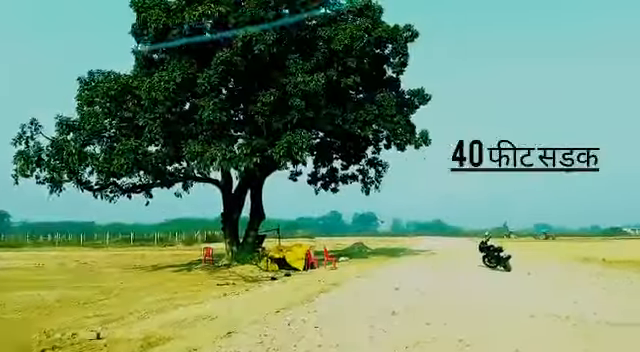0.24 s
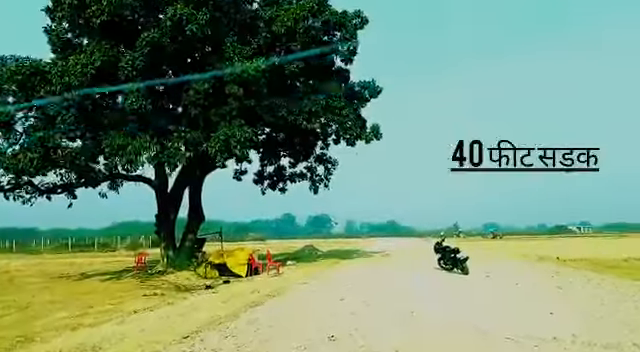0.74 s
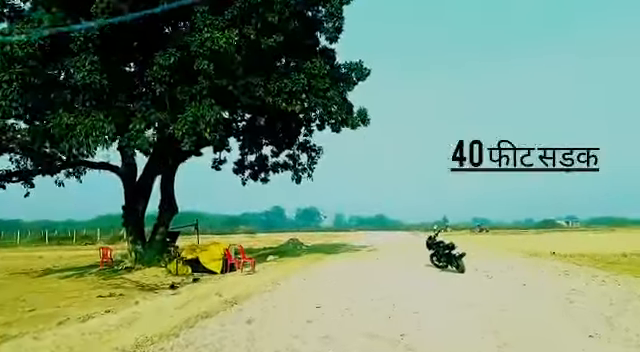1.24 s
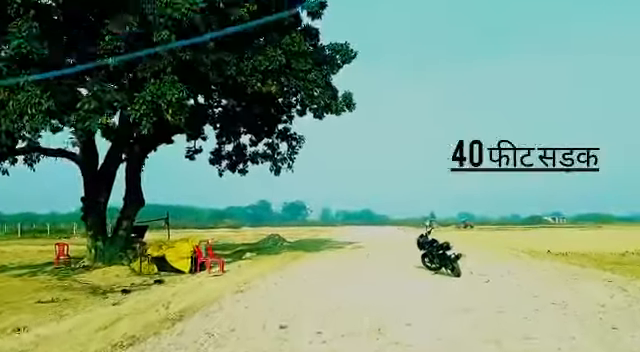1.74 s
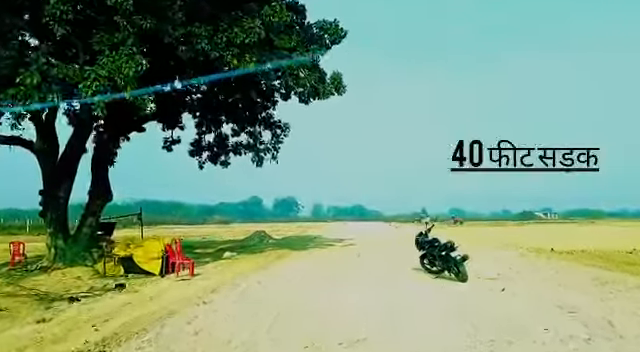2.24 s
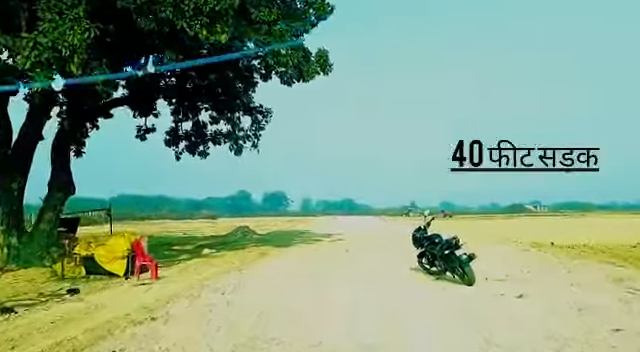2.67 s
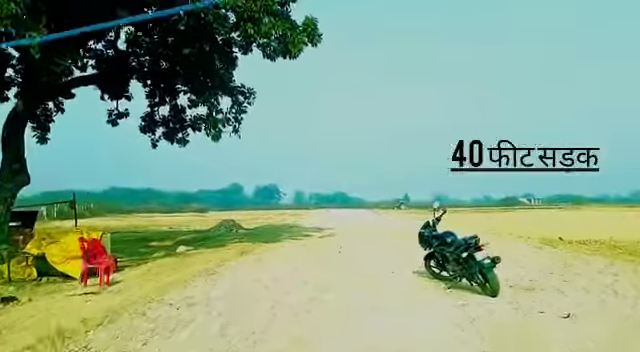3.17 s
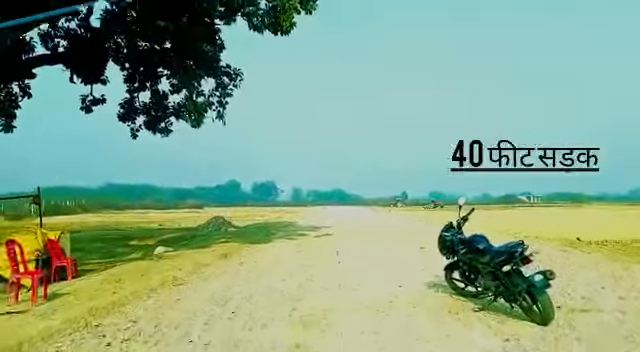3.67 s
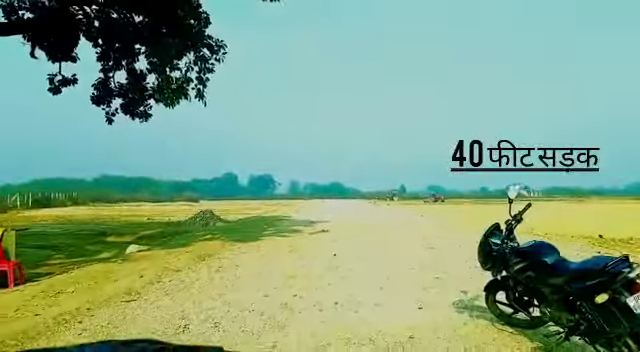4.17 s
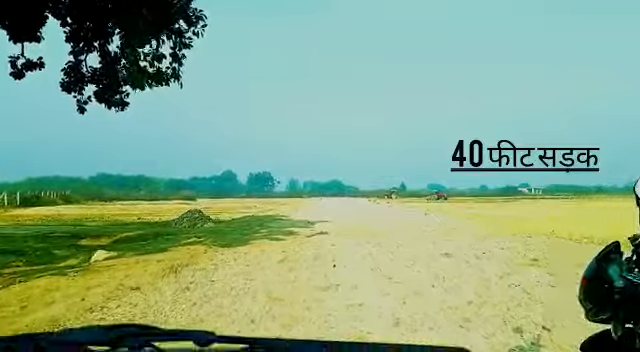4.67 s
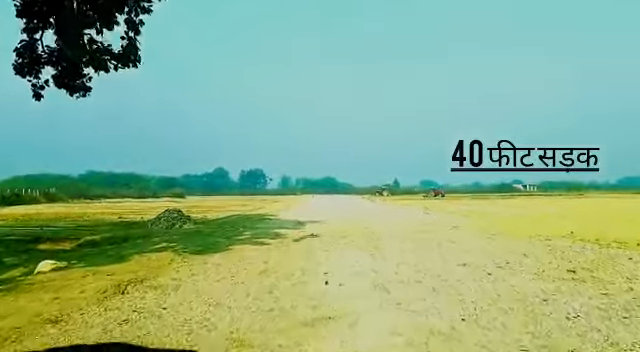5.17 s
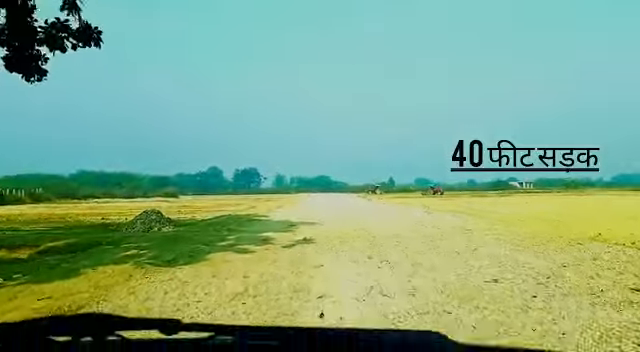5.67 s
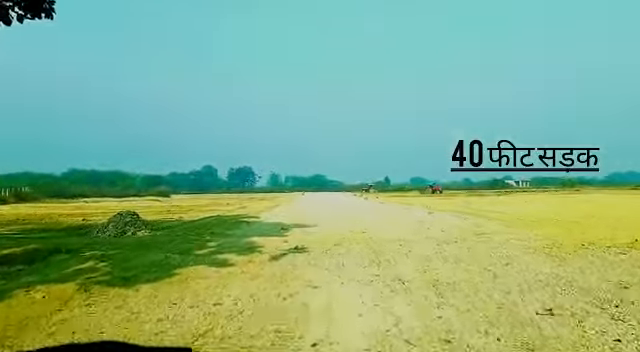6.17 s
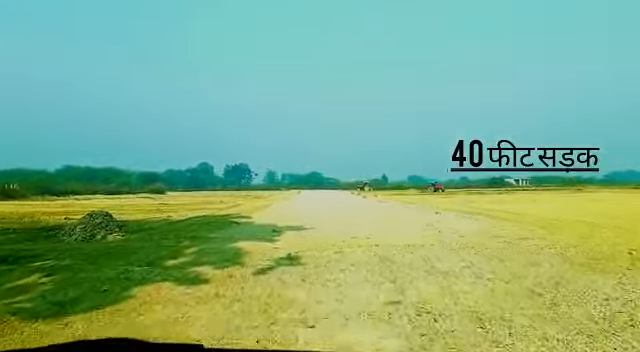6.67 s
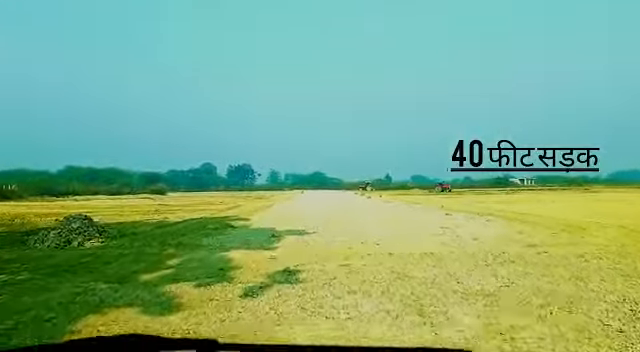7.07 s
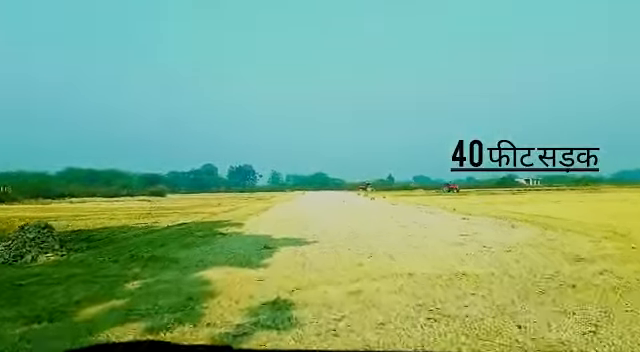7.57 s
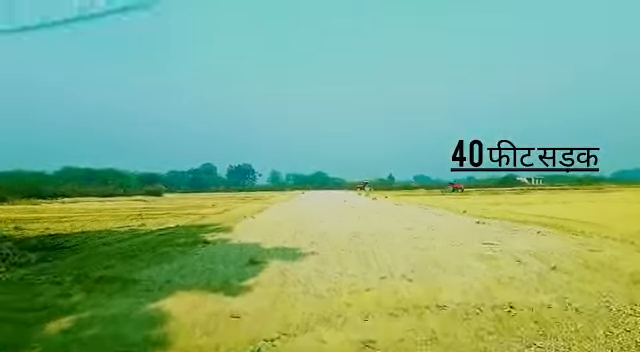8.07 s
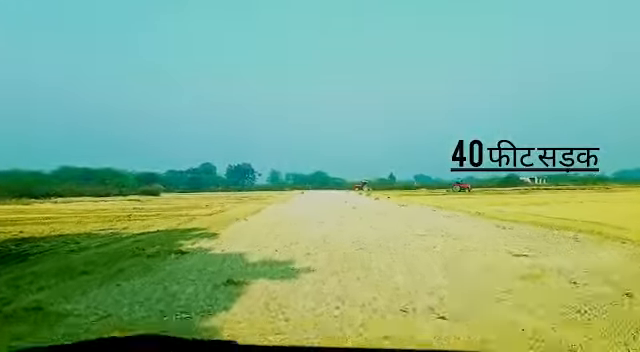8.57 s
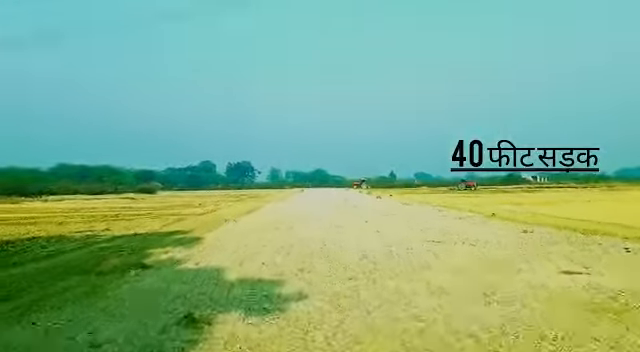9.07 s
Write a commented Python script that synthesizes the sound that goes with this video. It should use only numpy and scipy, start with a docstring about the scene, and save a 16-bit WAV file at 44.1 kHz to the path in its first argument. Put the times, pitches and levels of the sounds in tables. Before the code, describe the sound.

A car rolls slowly along a rough gravel road for about nine seconds, heard from inside its small, boxy cabin through a phone's close stereo microphones. From the start keys jingle almost without pause, bright, thin and uneven, with odd single keys ringing for an instant. Soft low bumps boom at the start and near 0.9 s. One hard crack comes at 1.9 s, then a dense run of deep thumps and body heaves fills 2.1 to 3.2 s, with another jolt and knock around 3.8 s. From 4 to 7 s it is calmer: keys dominate, with a strong bump at 5.7 s and light knocks after 6 s. Bumps return at 7.2 s, a sharp knock at 7.8 s, and from 8.4 s to the end the ride turns rough, thudding and rattling, with a hollow panel thunk at 9 s. Gravel crunches and hisses faintly underneath throughout.

```python
"""Inside a car rolling slowly over gravel, heard close by through a phone's two microphones.
Nearest the ear in level are bumps that boom the cabin's air (decaying-in-both-directions tone lumps over shaped noise),
then cracks of noise through the body and hollow thunks of trim panels (clusters of notes).
A bunch of keys clinks about a dozen times a second (struck modes and dense noise); single keys ring as sines.
Gravel crunches and hisses behind as grainy noise. The right port is nearer the keys but duller in the treble."""
import sys
import numpy as np
from scipy import signal
from scipy.fft import rfft, irfft, next_fast_len
from scipy.io import wavfile
from scipy.ndimage import uniform_filter1d, map_coordinates

SR = 44100
rng = np.random.default_rng(int(sys.argv[2]) if len(sys.argv) > 2 else 0)


def dump_mix(stems):
    """Bounce the given channels to the path in sys.argv[1] as a 16-bit WAV at rate SR."""
    frames = np.atleast_2d(stems).T  # one column per channel
    limited = np.clip(frames, -1, 1)  # hard clip at full scale
    pcm = np.round(limited * 32767).astype(np.int16)
    wavfile.write(sys.argv[1], SR, pcm)


N = 411453
T = np.arange(N) / SR

# Table levels are taken before the trims in the functions; spectra are relative level per Hz.
# roughness of the road: t/s, background boom level/dB, shake level/dB, panel drone level/dB
ROAD = [(0.0, -48.5, -38, -54.5), (0.39, -45.5, -44, -55.5), (1.06, -48, -46, -56.5),
        (1.27, -44, -49, -55.5), (1.56, -52.5, -57, -61), (1.87, -48, -39.5, -58), (2.26, -35.5, -47, -49),
        (3.56, -49.5, -44, -56.5), (3.87, -36.5, -41, -50), (4.16, -47.5, -50.5, -57),
        (4.62, -43.5, -45.5, -58), (5.14, -47, -53, -56.5), (5.56, -42.5, -50, -55.5),
        (5.84, -47, -48.5, -55.5), (7.04, -49.5, -35.5, -58), (7.25, -40.5, -47, -54.5),
        (8.34, -47.5, -49, -56), (8.55, -37.5, -39, -54), (8.83, -49, -43, -50.5),
        (9.33, -41.5, -47, -56.5)]
# bumps that set the cabin's air booming: t/s, peak level/dB, f/Hz, width/ms about 5 dB down (at least 15)
BUMPS = [(0.009, -21, 146.4, 18), (0.297, -31, 128, 24), (0.385, -32.5, 127, 64), (0.573, -23, 129.4, 31),
         (0.716, -28.5, 131, 10), (0.851, -19.5, 125, 30.5), (1.34, -26.5, 129, 37), (1.379, -23.5, 97, 9),
         (2.025, -26, 116.5, 30), (2.108, -16.5, 132.5, 33), (2.152, -27.5, 139, 11),
         (2.266, -18, 114.5, 48), (2.398, -32, 127, 13), (2.467, -16, 122, 17.5), (2.571, -19.5, 130, 18),
         (2.644, -15.5, 129.6, 15), (2.787, -29, 130, 20), (2.882, -30.5, 117, 12), (2.997, -34.5, 127, 32),
         (3.059, -24.5, 122, 13), (3.11, -25, 110, 10), (3.183, -20.5, 139, 34), (3.731, -19.5, 114, 60),
         (3.788, -18.5, 131.3, 58), (3.958, -32, 107, 16), (4.826, -24.5, 144, 33), (4.875, -24, 125, 24),
         (5.252, -25.5, 121, 48), (5.416, -22, 128, 35), (5.482, -27, 119, 12), (5.676, -14.5, 131, 40.5),
         (6.509, -28.5, 124.2, 85), (6.633, -27, 125, 26), (7.201, -16.5, 130, 34),
         (7.407, -21, 128.6, 114), (7.687, -28.5, 119, 13), (7.861, -29, 124, 26), (8.086, -22, 125.3, 45),
         (8.369, -21.5, 150.5, 32), (8.417, -30, 150, 38), (8.496, -26.5, 139, 38), (8.587, -17.5, 146, 18),
         (8.653, -14.5, 120.5, 43), (8.727, -22, 139.5, 34), (8.885, -26.5, 131, 44),
         (9.057, -16.5, 127, 27), (9.168, -28, 145, 49), (9.289, -24, 108, 13.5)]
# ruts that heave the whole body: start t/s, length/s, level/dB
HEAVES = [(0.828, 0.023, -37), (1.338, 0.048, -36.5), (1.454, 0.13, -34), (2.092, 0.11, -28.5),
          (2.219, 0.047, -34), (2.307, 0.049, -30), (2.385, 0.039, -29.5), (2.468, 0.14, -33.5),
          (2.662, 0.17, -30.5), (3.09, 0.11, -34), (3.68, 0.084, -28), (4.805, 0.041, -33),
          (5.407, 0.087, -34), (5.66, 0.12, -28), (6.463, 0.12, -34), (7.07, 0.025, -29),
          (7.12, 0.069, -35.5), (7.483, 0.038, -31.5), (7.92, 0.11, -29.5), (8.464, 0.064, -33),
          (8.65, 0.073, -37), (9.259, 0.03, -31.5)]
# jolts that rattle the panels: start t/s, length/s, level/dB
JOLTS = [(2.142, 0.057, -37), (2.358, 0.051, -35.5), (2.416, 0.11, -31), (3.762, 0.099, -33.5),
         (5.422, 0.067, -38.5), (7.826, 0.11, -38.5), (7.999, 0.069, -39), (8.355, 0.1, -31.5),
         (8.486, 0.055, -37.5), (8.567, 0.077, -37), (8.826, 0.18, -44), (9.001, 0.15, -27)]
# spectrum of the cabin's boom: f/Hz, level/dB
BOOM_SPECTRUM = [(30, -68), (70, -40), (100, -3.5), (120, 3), (130, 3.5), (150, -6), (185, -5.5),
                 (230, -84), (500, -130)]
# spectrum of the body's shake: f/Hz, level/dB
SHAKE_SPECTRUM = [(12, -33), (25, 9), (35, -1.5), (50, 15), (65, 18.5), (90, 19), (115, -45), (300, -130)]
# spectrum of the panels' drone: f/Hz, level/dB
DRONE_SPECTRUM = [(60, -74), (140, -7), (190, 0), (240, -1.5), (330, -4), (400, -12.5), (470, -12),
                  (600, -81), (1500, -130)]
# knocks through the body: t/s, peak level/dB, treble against it level/dB, rise/ms, t60/s
KNOCKS = [(1.889, -14, -0.5, 0.42, 0.1), (2, -35.5, 1, 7.5, 0.098), (2.46, -32, -17, 10, 0.23),
          (3.035, -24.5, -1.5, 9.5, 0.086), (3.778, -32, 13, 1, 0.074), (3.807, -17.5, -2.5, 0.44, 0.087),
          (3.936, -20, -1, 12, 0.098), (6.12, -32, 0, 4.7, 0.13), (6.295, -29.5, 5, 8, 0.15),
          (6.878, -36, -6, 8.5, 0.11), (7.067, -40.5, -7, 4.8, 0.13), (7.431, -35.5, 25, 8.9, 0.21),
          (7.798, -29, 6, 4, 0.15), (7.823, -15, 11, 4, 0.07), (7.944, -19, -9, 0.66, 0.13),
          (8.385, -38, -20, 4.7, 0.57), (8.512, -25, -1, 3.3, 0.092), (8.66, -16, 4, 4.3, 0.072),
          (9.021, -26, -5, 3.6, 0.53), (9.082, -20, -2.5, 3.9, 0.12)]
# spectrum of a knock up to its treble: f/Hz, level/dB
KNOCK_SPECTRUM = [(300, -29), (650, 1), (1000, -7), (1800, -0.5), (2500, -9)]
# short hollow thunks of trim panels: t/s, peak level/dB, f/Hz
THUNKS = [(2.479, -34, 489), (3.033, -41, 554), (3.807, -38.5, 713), (4.068, -41.5, 504),
          (4.472, -42.5, 623), (4.675, -44, 619), (4.689, -40, 850), (6.418, -40, 630), (6.466, -45, 668),
          (6.979, -40.5, 518), (7.368, -41.5, 530), (7.823, -43.5, 720), (8.391, -38.5, 592),
          (8.49, -38, 337), (8.655, -41.5, 584), (8.986, -44, 710), (9.015, -22, 334), (9.09, -31, 311),
          (9.129, -50, 556)]
# key clinks: t/s, peak of the loudest key level/dB, lower keys against it level/dB,
# thin high keys against it level/dB, rise/ms, nominal t60/ms (at least 40)
CLINKS = [(0.0287, -34, -7.5, -6, 12.2, 69), (0.097, -37, -7, -8, 5.9, 120),
          (0.1647, -34.5, -10, -4.5, 13.5, 32), (0.2411, -46.5, -3, -15, 1.8, 47),
          (0.3883, -59, -1.5, -13, 1.8, 490), (0.484, -37, -10.5, -14, 3.8, 59),
          (0.671, -40, -8, -8, 4.8, 120), (0.7399, -34.5, -4.5, -3.5, 6.5, 175),
          (0.816, -40, -12, -13, 2, 45), (0.9255, -54, -5, -26, 7, 37), (0.981, -41, -9, -18, 3, 120),
          (1.0676, -38.5, -8, -7, 4.7, 160), (1.143, -47, -2.5, -6, 19, 104),
          (1.2341, -53, 7.5, 7.5, 4, 74), (1.3114, -40, 0.5, -3, 6.6, 91),
          (1.386, -42.5, 0.5, -3, 1.8, 123), (1.4544, -49.5, -7, -6, 7.9, 46),
          (1.5272, -31, -15.5, -9, 3, 360), (1.6193, -40.5, -2.5, -10, 4, 91),
          (1.6832, -41.5, -3, 3, 4.8, 56), (1.7776, -39.5, -8, -14, 7.3, 130), (1.932, -45, -3, -10, 1, 84),
          (2.159, -44, -10, -17, 8.2, 98), (2.1793, -40, -18, -19, 1.8, 41), (2.23, -48, -16, -24, 1, 37),
          (2.3889, -49, 7, 1, 3.3, 160), (2.48, -55.5, 2, -9, 11, 65), (2.611, -39, -11, -9, 8.5, 54),
          (2.6777, -30.5, -11, -8.5, 4, 250), (2.757, -44, -8, -11, 1.2, 310),
          (2.827, -35.5, -7.5, -2.5, 14, 82), (3.019, -50, 1.5, -16, 17, 100),
          (3.17, -42, -8.5, -7, 15, 550), (3.246, -35, -8, -6, 28.7, 80), (3.312, -42.5, -11, -4, 10, 60),
          (3.386, -41, -5, -1.5, 14, 71), (3.5898, -39.5, -13, -11, 12, 43),
          (3.6647, -41.5, -9, -11.5, 5.9, 340), (3.7433, -56, 3, -5, 24, 940), (3.8048, -39, 0, -8, 3, 140),
          (3.913, -35.5, -5.5, -1.5, 41, 70), (4.0108, -33.5, -12, -7.5, 4.3, 104),
          (4.0872, -33.5, -11.5, -12, 7.2, 100), (4.125, -51.5, -0.5, 3, 11, 120),
          (4.2353, -38.0, -21, -14.5, 4.9, 120), (4.296, -36, -12, -14, 11, 38),
          (4.4517, -36.5, -3.5, -4.5, 5.6, 200), (4.5272, -31, -6.5, -2, 2.7, 87),
          (4.595, -41.5, -7, -2, 7.3, 200), (4.6504, -42.5, -3, -4, 1, 220),
          (4.773, -55.5, 10.5, -3, 2.3, 41), (4.869, -63, -6, 11.5, 2.3, 80),
          (4.894, -38, -10.5, -8.5, 8.9, 134), (4.972, -31, -13, -13.0, 27.7, 110),
          (5.091, -54, 3, -5, 1.8, 150), (5.1311, -36.5, -15.5, -10, 4.6, 310),
          (5.1684, -39.5, -15, -28, 1, 100), (5.343, -48, -5, 0, 2.7, 330),
          (5.3905, -41.5, -7, -30, 5.6, 150), (5.4653, -49.5, -10, -17, 16, 150.0),
          (5.538, -37.5, -13.5, -8, 2.6, 370), (5.607, -45.5, -4, -0.5, 1, 91),
          (5.685, -35.5, -3.5, -6, 3.5, 135), (5.7501, -40.5, -10.5, -8, 8.4, 220),
          (5.846, -56, -10, 1, 2, 77), (5.9784, -41, -6.5, -7, 6, 220), (6.049, -36.5, -10.5, -7, 3.5, 240),
          (6.113, -33, -5.5, -5.5, 6.2, 140), (6.2054, -42, -9, -15.5, 3.3, 180),
          (6.2847, -32, -7.5, -9.5, 14, 213), (6.45, -39.5, -4.5, -3.5, 2.5, 160),
          (6.5327, -37, -14, -10.5, 7.1, 120), (6.676, -50, -9, -15, 2.3, 40),
          (6.704, -49, -13.5, -6, 8, 67), (6.754, -57.5, 5.5, -3.5, 2.3, 53),
          (7.162, -41.5, -6, -1.5, 9.2, 330), (7.2356, -37, -2, -15, 5, 99),
          (7.4198, -53, 0.5, -0.5, 6.6, 510), (7.498, -34.5, -6.5, -7, 6.1, 43),
          (7.571, -50, -2, -9, 4, 220), (7.6548, -43, -4.5, -10.5, 4.3, 150),
          (7.7427, -35.5, -7.5, -9, 3.9, 230), (7.7951, -28.5, -4.5, -7, 33, 85),
          (7.8782, -37.5, -1, -8, 13, 250), (7.9423, -56, 2, 4, 1.6, 570),
          (8.0317, -37.5, -13, -8.5, 7.1, 150), (8.328, -43.5, -1, 1, 2.2, 200),
          (8.395, -38, -4.5, -2.5, 2.3, 210), (8.515, -50, 4, -7, 1, 130.0),
          (8.65, -36, 0.5, -0.5, 1.9, 230), (8.7157, -39, -2.5, -2, 2.5, 140),
          (8.7918, -39.5, -4.5, -3, 1.9, 210), (8.9403, -42.5, -0.5, -1, 13, 350),
          (9.0038, -34, -6.5, -6.5, 8.2, 230), (9.076, -34, -13.5, -5.5, 9.3, 150),
          (9.1424, -38.5, -4.5, -6.5, 4.9, 1100), (9.188, -41, 1, -7.5, 5.6, 100)]
# centres of the lower, loudest and thin high keys: f/Hz
CLINK_HZ = [5200, 6500, 8000]
# clear modes of the keys: f/Hz, level/dB, t60/s
KEY_MODES = [(2952, -79, 0.62), (3447, -76, 0.17), (4632, -73.5, 0.3), (5040, -74, 0.16),
             (5770, -72.5, 0.063), (6497, -63.5, 0.13), (6528, -58.5, 0.12), (7460, -80, 0.059),
             (7650, -63.5, 0.015), (8784, -72, 0.34), (9500, -65.5, 0.039), (14976, -93.5, .08)]
# spectrum of the keys' dense small modes: f/Hz, level/dB
JANGLE_SPECTRUM = [(600, -17.5), (1100, -13), (1700, 2), (2300, -12), (3000, -7), (4000, -6.5),
                   (5300, -12.5), (6450, 7), (7300, -9), (8150, -35), (8700, -7), (10200, -7),
                   (11400, -17.5), (12300, -40), (14000, -39), (15000, -37), (16000, -51.5)]
# one key swings clear of the bunch and rings: start t/s, length/s, peak level/dB, f/Hz
CHIMES = [(0.034, 0.18, -50, 4640), (0.039, 0.098, -61, 5130), (0.487, 0.035, -53, 4610),
          (0.69, 0.05, -62, 5000), (0.747, 0.054, -48, 8767), (0.767, 0.045, -47, 5065),
          (1.074, 0.045, -50, 4570), (1.08, 0.05, -54, 5060), (1.147, 0.067, -56, 5100),
          (1.448, 0.036, -52, 4590), (1.526, 0.059, -44, 4620), (1.556, 0.11, -52, 5010),
          (1.594, 0.041, -57, 8700), (1.676, 0.021, -64, 3410), (1.842, 0.012, -39.5, 5060),
          (2.197, 0.04, -61, 4630), (2.26, 0.023, -57, 4690), (2.395, 0.038, -58, 4650),
          (2.621, 0.25, -55.5, 4660), (2.689, 0.052, -51, 8773), (2.786, 0.042, -50, 8759),
          (3.178, 0.073, -57, 4630), (3.197, 0.2, -47, 3430), (3.264, 0.051, -52, 5061),
          (3.794, 0.069, -50, 8763), (3.955, 0.25, -61, 3400), (4.012, 0.026, -44, 4630),
          (4.093, 0.041, -57, 5060), (4.446, 0.18, -56.5, 8760), (4.458, 0.1, -56, 5100),
          (4.592, 0.023, -48, 4640), (4.969, 0.056, -51, 4730), (4.996, 0.065, -55, 3430),
          (5.137, 0.043, -52, 4660), (5.153, 0.09, -59, 5030), (5.381, 0.084, -57, 5060),
          (5.65, 0.21, -58, 3465), (5.99, 0.27, -56.5, 4980), (6.093, 0.038, -39, 5650),
          (6.447, 0.037, -48, 4620), (6.542, 0.031, -46, 5040), (7.066, 0.04, -58.5, 2600),
          (7.16, 0.027, -46, 4650), (7.222, 0.061, -52, 4675), (7.66, 0.046, -53, 5080),
          (8.039, 0.091, -51.5, 4675), (8.328, 0.13, -51.5, 5050), (8.336, 0.1, -54, 3450),
          (8.402, 0.043, -50, 4670), (8.664, 0.1, -45, 3460), (8.812, 0.086, -55, 8761),
          (9.046, 0.034, -43, 8800), (9.195, 0.036, -57, 3410)]
# how the cabin's answer dies: f/Hz, t60/s
CABIN = [(500, 0.32), (4000, 0.15), (12000, 0.032)]
# gravel under the tyres: t/s, crunch level/dB, hiss level/dB
GRAVEL = [(0.0, -64, -59), (0.72, -64, -65), (1.48, -65, -56.5), (1.92, -67.5, -61.5), (2.39, -58.5, -57.5),
          (2.96, -63.5, -61), (3.66, -66, -62), (3.84, -61, -59.5), (5.38, -65.5, -64), (5.56, -63, -56.5),
          (5.92, -65.5, -66.5), (6.31, -60.5, -54.5), (6.62, -66.5, -63.5), (7.95, -64.5, -64.5),
          (8.26, -65, -59), (8.58, -60, -52.5), (8.78, -62, -55.5), (9.33, -57, -55.5)]
# spectrum of the crunch: f/Hz, level/dB
CRUNCH_SPECTRUM = [(150, -75), (350, -7), (500, 7), (650, 3), (850, 2), (1100, -6), (1500, -22.5),
                   (4000, -130)]
# spectrum of the hiss: f/Hz, level/dB
HISS_SPECTRUM = [(530, -29), (900, -30), (1120, -0.5), (1260, 0.5), (2600, -6), (3110, -9), (3890, -12.5),
                 (6000, -7), (6670, -8), (7740, -29.5), (8150, -28), (8700, -17.5), (11300, -32),
                 (14700, -63), (22000, -120)]
# likeness of left and right in the road and gravel noise: f/Hz, correlation
ALIKE = [(60, 0.98), (110, 0.99), (190, 0.97), (340, 0.54), (610, 0.48), (1080, -0.23), (1920, 0.28),
         (3430, -0.27), (6110, 0.057), (10900, 0.47)]
# microphone ports: f/Hz, left minus right level/dB
PORTS = [(130, -.5), (300, -2.5), (700, 1), (1800, 4), (3300, 3.5), (4700, -3), (5800, -7.5), (6500, -1),
         (7400, 14.5), (8000, 27), (8500, 18), (10000, 32), (11500, 31), (13000, 10), (15500, 6)]

CONTACTS, SPREAD_DB = 500, 6.5  # contacts a second in a clink, chance in each mode's level
HOLD_MS, STOP_DB_PER_MS = 63, 0.2  # the bunch falls quiet this long after the rise, nominal rate
GLINT_DB = 5.5  # small modes flare up and die inside a clink
BODY_HZ, BODY_RISE_S = 4350, 0.004  # the lower jangle joins late
RING_DB, ROUND = 77.5, 0.3  # gain of the clear modes, share of the rise that rounds the front
THIN_HZ, JOIN_S = 7800, 0.008  # lower edge of the thin keys, mean chance time in which keys join
CHIME_RISE_S, CHIME_FADE_DB, CHIME_STOP_S = 0.008, 9, 0.004  # onset, loss over the length, damping
GRAZES, FLICKER_DB, SLIP_RAD = 110, 4, 1.6  # grazes a second, swing of level and of phase
LAG_S = 0.0004182  # the left port is farther from the keys
TOP_HZ = 15800


def road():
    """Bumps drive the cabin's air mode in lumps; the body and its panels follow each lump in part."""
    boom_db, shake_db, drone_db = curves(ROAD)
    lumps, force = np.zeros(N + SR), np.zeros(N + SR)
    t = np.arange(-SR // 5, SR // 5) / SR
    phases = 2 * np.pi * rng.random(len(BUMPS))
    for (s, db, hz, width_ms), phase in zip(BUMPS, phases):
        swell = amp(db - 20.7 * (1000 * t / max(width_ms, 15)) ** 2)
        lumps[round(s * SR):][:len(t)] += swell * np.sin(2 * np.pi * hz * t + phase)
        force[round(s * SR):][:len(t)] += swell
    lumps = lumps[SR // 5:][:N]
    force = force[SR // 5:][:N] + amp(boom_db + 6)
    follow = force / smooth(force, 0.39)
    # now one side of the car is shaken harder, now the other
    lean = amp(1.03 * wobble(9.7) * np.array([[1], [-1]]))
    boom_noise = rush(BOOM_SPECTRUM, grit_db=2.5, patchy_db=-5.0, steady=0.1, hold_s=0.01)
    boom = lean * lumps + amp(boom_db + 6.5) * boom_noise
    heave = swells(shake_db + 1 + 1.1 * wobble(5.5), HEAVES, spread_db=33)
    shake_noise = rush(SHAKE_SPECTRUM, grit_db=6.0, patchy_db=-0.5, steady=0.039, hold_s=0.018)
    shake = heave * follow ** 0.23 * shake_noise
    rattle = swells(drone_db + 5.5 + 1.7 * wobble(9.6), JOLTS, spread_db=46)
    drone_noise = rush(DRONE_SPECTRUM, grit_db=0.5, patchy_db=4.5, steady=0.28, hold_s=0.045)
    return boom + shake + rattle * follow ** 0.3 * drone_noise


def knocks():
    """A gritty crack of broad noise, sharp or swelling at the front, a little different at each port."""
    out, t = np.zeros((2, N + SR)), np.arange(SR // 4) / SR
    for s, db, treble_db, rise_ms, t60 in KNOCKS:
        treble = [(3500, treble_db - 0.5), (6200, treble_db - 0.5), (8000, treble_db - 17.5),
                  (11000, treble_db - 33.0), (13000, -63)]
        colour = [(100, -65)] + KNOCK_SPECTRUM + treble
        grit = np.repeat(amp(4 * rng.standard_normal(len(t) // 63)), 63)
        noise = grit * rng.standard_normal((2, len(t)))
        burst = unit(filtered(noise, lambda hz: amp(along(colour, hz))))
        front = 1 - np.exp(-1000 * t / max(rise_ms, 0.3))
        out[:, round(s * SR):][:, :len(t)] += amp(db - 9.0 - 60 * t / max(t60, 0.03)) * front * burst
    return out[:, :N]


def thunks():
    """A panel swells into a brief cluster of four notes, low ones alike on both sides, high ones not."""
    out, t = np.zeros((2, N + SR)), np.arange(SR // 4) / SR
    for s, db, hz in THUNKS:
        detune = 1 + 0.14 * rng.standard_normal((4, 1, 1))
        phase = rng.standard_normal((2, 4, 2, 1))
        side_db = 1.5 * rng.standard_normal((2, 1))
        start = 2 * phase[0, :, :1] + (hz / 520) ** 2 * phase[1]  # shared part, then each side's own
        note = np.sum(np.sin(2 * np.pi * hz * detune * t + start), axis=0)
        swell = amp(db - 3.5 - 60 * t / 0.21) * (1 - np.exp(-t / 0.0014)) ** 2
        out[:, round(s * SR):][:, :len(t)] += amp(side_db) * swell * note
    return out[:, :N]


def keys():
    """A first contact and a flurry more excite modes and jangle; then the keys settle and damp the ring."""
    s, peak_db, low_db, high_db, rise_ms, t60_ms = np.transpose(CLINKS)[:, :, None]
    colour = np.hstack([low_db - np.median(low_db), 0 * s, high_db - np.median(high_db)])
    tilt = lambda hz: np.array([np.interp(np.log(hz), np.log(CLINK_HZ), c) for c in colour])
    t = np.arange(SR // 6) / SR
    rise_ms = np.maximum(rise_ms, 0.5)
    late_ms = 1000 * t - rise_ms
    stop = amp(-STOP_DB_PER_MS * np.maximum(late_ms - HOLD_MS, 0))
    settle = amp(-60 * np.maximum(late_ms, 0) / np.maximum(t60_ms, 40)) * stop

    draw = rng.standard_normal((len(s), 3, len(t)))
    touch = draw[:, 0] * (rng.random((len(s), len(t))) < CONTACTS / SR)
    touch[:, 0] = 1.31  # the first contact
    force = touch * amp(-60 * np.maximum(late_ms, 0) / 40)

    # clear modes, evened for how strongly the contacts happen to reach each one
    hz, db, t60 = np.transpose(KEY_MODES)[:, :, None]
    modes = amp(db - 60 * t / t60) * (1 - np.exp(-t / 0.00091)) * np.sin(2 * np.pi * hz * t)
    grid = np.fft.rfftfreq(len(t), 1 / SR) + 1
    reach = np.abs(rfft(force)) ** 2 @ np.exp(-((grid[:, None] - hz.T) / 60) ** 2)
    chance_db = SPREAD_DB * np.tanh(draw[:, 1, :len(hz)])
    struck = amp(tilt(hz[:, 0]) + chance_db) / np.sqrt(reach)
    ring = signal.fftconvolve(force, struck @ modes, axes=1)[:, :len(t)] * settle ** 0.79

    # dense small modes: noise with glints in time and chance peaks in frequency
    z = signal.stft(draw[:, 2], nperseg=512)[2]
    glints = uniform_filter1d(rng.standard_normal(z.shape), size=2, axis=1)
    glints = uniform_filter1d(glints, size=4, axis=2)
    shimmer = signal.istft(z * amp(GLINT_DB * unit(glints)), nperseg=512)[1][:, :len(t)]
    peaks = np.repeat(draw[:, 1, -len(grid) // 8 - 1:], 8, axis=1)[:, :len(grid)]
    peaks_db = 4 * np.minimum(grid / 3500, 1) * peaks
    dense = rfft(shimmer) * amp(along(JANGLE_SPECTRUM, grid) + 1.19 * tilt(grid) + peaks_db)

    # the loudest key starts the jangle; the other bands join after chance times
    low = 1 / (1 + (grid / BODY_HZ) ** 4)
    thin, main = grid > THIN_HZ, grid >= CLINK_HZ[1] - 500
    join_s = JOIN_S * rng.exponential(size=(3, len(s), 1)) + 0.001
    parts = [(low, BODY_RISE_S + join_s[0]), ((1 - low) * ~main, join_s[2]),
             ((1 - low) * ~thin * main, 0.0015), ((1 - low) * thin, join_s[1])]
    jangle = sum(irfft(dense * band, len(t)) * (1 - np.exp(-2 * t / rise_s)) ** 2
                 for band, rise_s in parts)
    grain = uniform_filter1d(np.abs(touch), size=130) * 130 + 0.69  # lumpy where contacts crowd
    front = 1 - np.exp(-1000 * t / (ROUND * rise_ms))
    clink = front * (amp(RING_DB) * ring + jangle * grain ** 0.81 * settle ** 0.99)

    # level each clink by the peak of its loudest key
    loudest = irfft(rfft(clink) * (np.abs(grid - CLINK_HZ[1]) < 450), len(t))
    peak_power = 2 * uniform_filter1d(loudest ** 2, size=300).max(axis=1, keepdims=True)
    clink = clink * amp(peak_db - 2.5) / np.sqrt(peak_power)
    spots = np.minimum((s * SR).astype(int) + np.arange(len(t)), N)
    return np.bincount(spots.ravel(), clink.ravel(), N + 1)[:N]


def chimes():
    """A fading note flickers as neighbours graze the key and stops when it falls back on the bunch."""
    out, t = np.zeros(N + SR), np.arange(SR // 3) / SR
    for (s, length, db, hz), knots in zip(CHIMES, rng.standard_normal((len(CHIMES), 2, 40))):
        flicker, slip = (map_coordinates(k, [t * GRAZES]) for k in knots)
        shape = (1 - np.exp(-t / CHIME_RISE_S)) * np.exp(-np.maximum(t - length, 0) / CHIME_STOP_S)
        level = amp(db + 1.5 - CHIME_FADE_DB * t / length + FLICKER_DB * flicker)
        out[round(s * SR):][:len(t)] += level * shape * np.sin(2 * np.pi * hz * t + SLIP_RAD * slip)
    return out[:N]


def cabin(x, count=3):
    """Each frequency of the cabin's answer dies at its own speed; answers alternate as the keys swing."""
    hz, t, z = signal.stft(rng.standard_normal((count, 2, SR // 6)), SR, nperseg=256)
    tail = signal.istft(z * amp(-60 * t / along(CABIN, hz)[:, None]), SR, nperseg=256)[1]
    # cross-fade to the next answer every 0.21 s
    turn = (T / 0.21 - np.arange(count)[:, None]) % count
    place = np.cos(np.pi / 2 * np.clip(np.abs(turn - 1), 0, 1)) ** 2
    late = np.pad(place * x, ((0, 0), (120, 0)))[:, None]  # 120 samples behind the direct sound
    wet = signal.oaconvolve(late, tail / np.linalg.norm(tail[0, 0]), axes=2)
    return wet.sum(axis=0)[:, :N]


def gravel():
    """Stones crunch and hiss under the tyres, dulled by the floor; a jolt grinds them harder."""
    crunch_db, hiss_db = curves(GRAVEL)
    grinds = [(s, length, db - 14.5) for s, length, db in JOLTS]
    crunch = swells(crunch_db + 5 + 2.0 * wobble(7), grinds, spread_db=18.6)
    crunch = crunch * rush(CRUNCH_SPECTRUM, grit_db=1.0, patchy_db=4)
    return crunch + amp(hiss_db - 3.0) * rush(HISS_SPECTRUM, grit_db=1.5, patchy_db=4.5)


def rush(spectrum, grit_db, patchy_db, steady=0., hold_s=0.075):
    """Stereo noise of rms 1; grit makes it grainy, patches lumpy, steady evens out its own swells."""
    grit = np.repeat(amp(grit_db * rng.standard_normal(N // 128 + 1)), 128)[:N]
    z = signal.stft(grit * rng.standard_normal((2, N)), nperseg=1024)[2]
    patches = uniform_filter1d(rng.standard_normal(z.shape[1:]), size=3, axis=0)
    patches = uniform_filter1d(patches, size=4, axis=1)
    noise = signal.istft(z * amp(patchy_db * unit(patches)), nperseg=1024)[1][:, :N]

    def mid_side(hz):
        """Splits the spectrum so that left and right are as alike as the table says."""
        angle = np.arccos(np.clip(along(ALIKE, hz), -1, 1)) / 2
        return amp(along(spectrum, hz)) * (hz > 10) * [np.cos(angle), np.sin(angle)]

    mid, side = filtered(noise, mid_side)
    pair = unit(np.array([mid + side, mid - side]))
    swell = np.abs(smooth(np.mean(pair ** 2, axis=0), hold_s)) + 0.11
    return unit(pair * swell ** (-steady / 2))


def swells(background_db, rows, spread_db):
    """A background gain with a bell-shaped swell added in power for each row."""
    power = amp(background_db) ** 2
    for s, length, db in rows:
        near = slice(max(round((s - length) * SR), 0), round((s + 2 * length) * SR))
        power[near] += amp(db - spread_db * ((T[near] - s) / length - 0.5) ** 2) ** 2
    return np.sqrt(power)


def wobble(rate):
    """A smooth random curve, rate knots a second."""
    return map_coordinates(rng.standard_normal(int(N * rate / SR) + 4), [T * rate])


def smooth(x, s):
    """Two running means of s seconds round the corners of a control."""
    return uniform_filter1d(uniform_filter1d(x, round(s * SR)), round(s * SR))


def curves(rows):
    """One value per sample for each column after the time."""
    s, *cols = np.transpose(rows)
    return [np.interp(T, s, c) for c in cols]


def along(points, hz):
    """Points of frequency and value, read on a log frequency axis."""
    f, v = np.transpose(points)
    return np.interp(np.log(hz + 1), np.log(f + 1), v)


def filtered(x, response):
    """x times a response of frequency."""
    m = next_fast_len(x.shape[-1] + 8192)
    return irfft(rfft(x, m) * response(np.fft.rfftfreq(m, 1 / SR)), m)[..., :x.shape[-1]]


def unit(x):
    """Scaled to rms 1."""
    return x / np.sqrt(np.mean(x ** 2) + 1e-20)


def amp(db):
    """dB to gain."""
    return 10 ** (np.asarray(db) / 20)


def scene():
    """Sums the layers; the direct sound of the keys reaches the right port first."""
    ring, notes = keys(), chimes()
    lag = lambda hz: np.exp(-1j * np.pi * hz * LAG_S * np.array([[1], [-1]]))
    direct = filtered(ring + amp(-1.5) * notes, lag)
    body = road() + gravel() + thunks() + knocks()
    return body + amp(2.5) * direct + amp(3.0) * cabin(ring + amp(-8) * notes)


def record(dry):
    """The ports share each frequency unevenly and add a faint hiss; nothing is kept above the band limit."""
    share = lambda hz: 2 / (1 + amp(along(PORTS, hz) * np.array([[-1], [1]])))
    margin = SR // 20
    padded = np.pad(dry, ((0, 0), (margin, margin)), "reflect")
    heard = filtered(padded, share)[:, margin:][:, :N]
    heard = heard + amp(-86) * rng.standard_normal((2, N))
    return filtered(heard, lambda hz: hz < TOP_HZ)


dry = scene()
out = record(dry)
dump_mix(out)
```